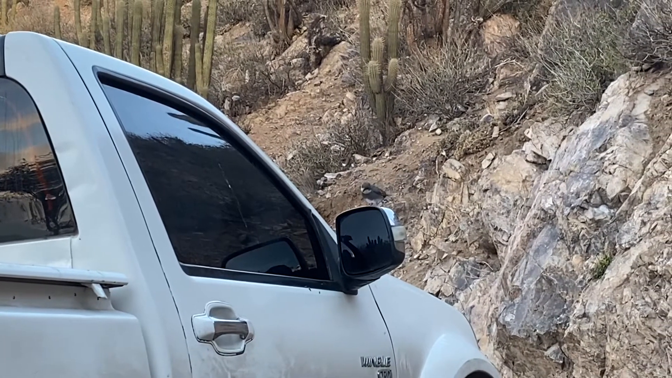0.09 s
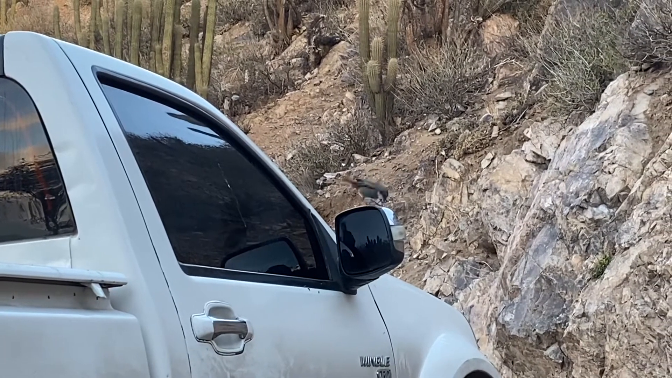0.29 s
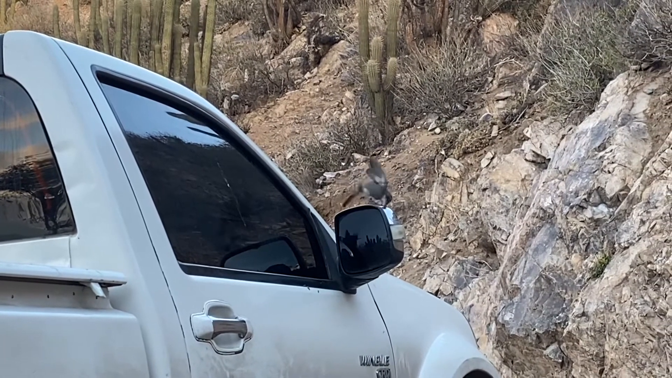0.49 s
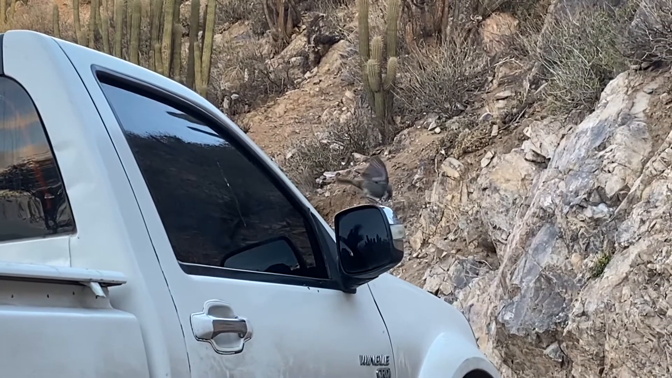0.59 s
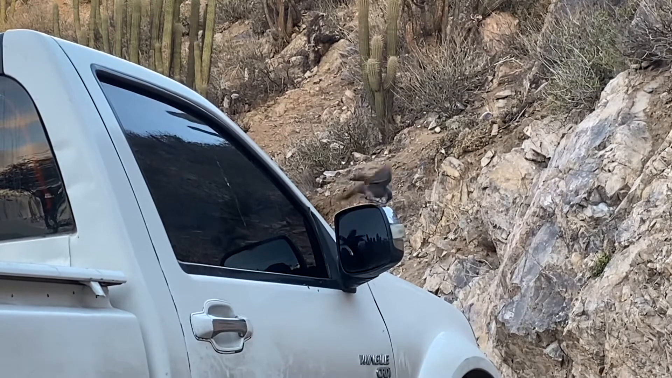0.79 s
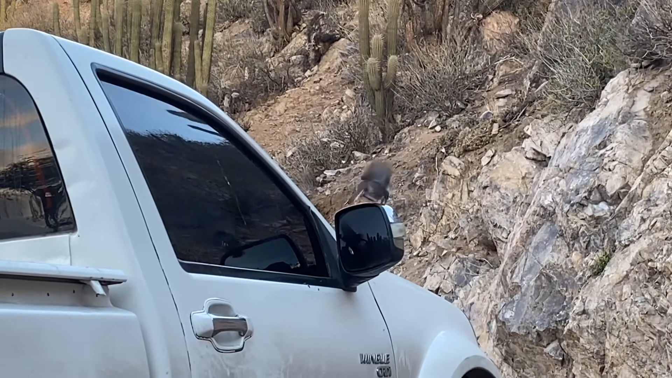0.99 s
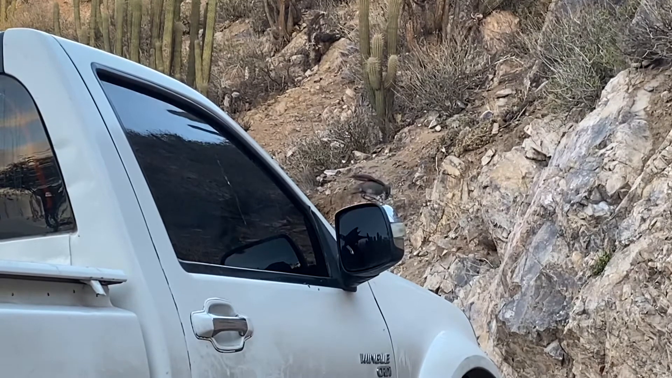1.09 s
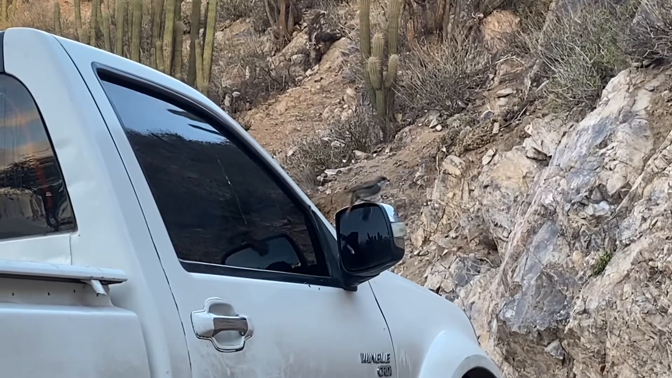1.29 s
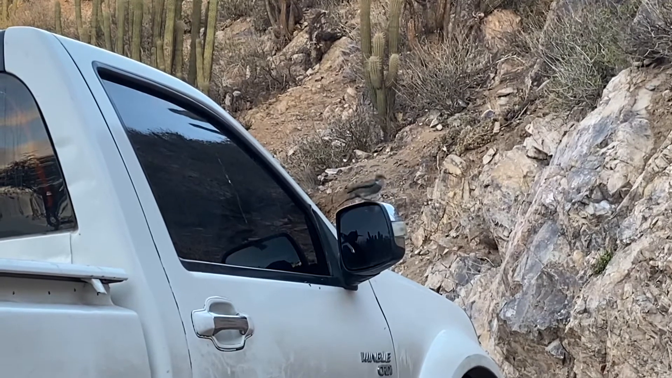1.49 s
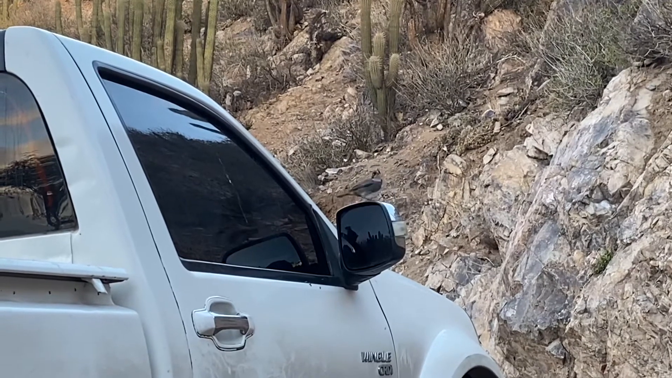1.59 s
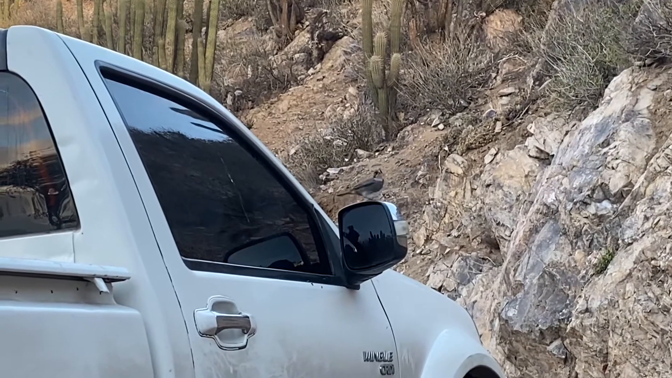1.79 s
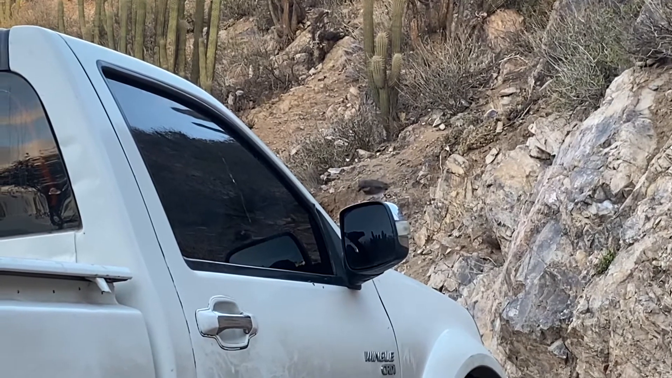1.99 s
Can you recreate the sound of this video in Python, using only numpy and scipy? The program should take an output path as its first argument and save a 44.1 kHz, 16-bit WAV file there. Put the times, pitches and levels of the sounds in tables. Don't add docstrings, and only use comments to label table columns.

```python
import sys
import numpy as np
from scipy import signal
from scipy.fft import rfft, irfft
from scipy.io import wavfile
from scipy.ndimage import uniform_filter1d

SR = 44100
rng = np.random.default_rng(int(sys.argv[2]) if len(sys.argv) > 2 else 0)


def level_to_linear(level):
    exponent = np.asarray(level, float) / 20
    return 10 ** exponent


def inscribe(sig):
    pcm = np.round(np.clip(np.atleast_2d(sig).T, -1, 1) * 32767)
    wavfile.write(sys.argv[1], SR, pcm.astype(np.int16))


N = 88200

# start_s, level_db, tilt_db_per_octave, strongest_mode_extra_db, two_low_modes_extra_db
PECKS = [
    (0.2242, -27.5, -1, 15.5, 3.5),
    (0.3597, -29.5, 0, 10.5, 7),
    (0.4845, -31, 1.5, 0.1, 4.5),
    (0.617, -29.5, 2, -13, 0.5),
    (0.7442, -29.5, 1, 7, -4),
    (0.8706, -29.5, -0.5, -6, -6),
    (0.9977, -28.5, 1.5, -12, 2.5),
    (1.1476, -27.5, 0.5, 4, -1),
]


def evened(x):
    return x / np.sqrt(np.mean(x ** 2) + 1e-20)


def read(points, hz):
    f, value = np.transpose(points)
    return np.interp(np.log(hz + 1), np.log(f + 1), value)


def add(mix, s, sound):
    part = mix[round(s * SR):][:len(sound)]
    part += sound[:len(part)]


def fuzzy_line(hz, width_hz):
    f = np.fft.rfftfreq(N, 1 / SR)
    noise = rfft(rng.standard_normal(N))
    return evened(irfft(noise / (1 + (2 * (f - hz) / width_hz) ** 2), N))


def wash():
    # pitch_hz, level_db_per_hz
    air = [(25, -31), (66, -5), (97, -1.5), (157, -11.5), (1560, -29), (2350, -45), (3600, -55.5),
           (12300, -60.5), (13300, -80)]
    # pitch_hz, likeness_0_to_1
    likeness = [(60, 0.35), (150, 0.52), (380, 0.95), (950, 0.51), (2380, 1), (5980, 1), (15000, 0.33)]
    frames, hz = N // 512 + 5, np.fft.rfftfreq(2048, 1 / SR)
    a, b, c, d, patches = rng.standard_normal((frames, 1025, 5)).T
    patches = uniform_filter1d(patches, size=20, axis=0)
    patches = evened(uniform_filter1d(patches, size=8, axis=1))
    same = np.clip(read(likeness, hz), -1, 1)[:, None]
    left = a + 1j * b
    right = same * left + np.sqrt(1 - same ** 2) * (c + 1j * d)
    z = np.array([left, right]) * level_to_linear(read(air, hz)[:, None] + 0.4 * patches)
    return level_to_linear(-54.5) * evened(signal.istft(z, nperseg=2048, noverlap=1536)[1][:, :N])


def hum():
    # pitch_hz, width_hz, level_db
    lines = [(58.3, 14, -56), (78.5, 12.4, -56), (151.98, 1.8, -59.5), (201.1, 4, -68.5)]
    # time_s, level_db
    curve = [(0.0, -48.5), (0.089, -50.5), (0.3, -50), (1.04, -55.5), (1.061, -44.5), (1.561, -56.5),
             (1.598, -36.5), (1.68, -79), (1.722, -48), (1.93, -63.5), (1.969, -48), (2.0, -57.5)]
    upper_swell = 0.4
    s, level = np.transpose(curve)
    swell_db = np.interp(np.arange(N) / SR, s, level) + 49
    out = np.zeros(N)
    for hz, width_hz, db in lines:
        share = 1 if hz < 100 else upper_swell
        out += level_to_linear(db + swell_db * share - 3 * (hz > 100)) * fuzzy_line(hz, width_hz)
    return out


def after_ring():
    levels = [-47, -52, -44, -46, -48, -48.5, -50.5, -55.5]
    ring_hz, width_hz, rise_s, t60_s = 486.7, 40, 0.06, 0.42
    t, envelope = np.arange(SR // 3) / SR, np.zeros(N)
    for (s, *_), db in zip(PECKS, levels):
        add(envelope, s, np.clip(t / rise_s, 0, 1) ** 2 * level_to_linear(db - 60 * t / t60_s))
    return envelope * fuzzy_line(ring_hz, width_hz)


def scatter(x):
    level_db, t60_s, low_hz = -19.5, 0.034, 900
    taps = rng.standard_normal(2000) * level_to_linear(-60 * np.arange(2000) / SR / t60_s)
    b, a = signal.butter(2, [low_hz / (SR / 2), .3], "band")
    side = signal.fftconvolve(signal.lfilter(b, a, x), taps / np.linalg.norm(taps))[:N]
    return level_to_linear(level_db) * np.array([side, -side])


def tail(far_db):
    # pitch_hz, t60_s
    panel_t60 = [(700, 0.2), (2500, 0.095), (6000, 0.066), (14000, 0.12)]
    far_t60_s = 0.48
    hz, t, z = signal.stft(rng.standard_normal(SR // 2), SR, nperseg=128)
    panels = level_to_linear(-60 * t / read(panel_t60, hz)[:, None])
    rocks = level_to_linear(far_db - 60 * t / far_t60_s)
    return signal.istft(z * (panels + rocks), SR, nperseg=128)[1]


def hump(hz):
    return np.exp(-(np.log2(np.clip(hz, 500, None) / 3050) / .3) ** 2)


def colour(tilt_db, mid_db=0):
    # pitch_hz, level_db_per_hz
    crack = [(410, -60), (700, -14.5), (3460, -5), (5060, -15.5), (7290, -16.5), (9110, -25.5),
             (12500, -28), (14500, -35), (16000, -35.5)]
    ragged_db = 1.8
    hz = abs(np.fft.fftfreq(2048, 1 / SR))
    ragged = np.interp(hz, np.linspace(0, SR / 2, 24), rng.standard_normal(24))
    db = read(crack, hz) + tilt_db * np.log2(np.clip(hz, 500, None) / 3000)
    db = db - 30 * (hz < 500) + ragged_db * ragged + mid_db * hump(hz)
    log = np.log(level_to_linear(db))
    tap = np.fft.ifft(np.exp(log - 1j * signal.hilbert(log).imag)).real[:1024]
    return tap / np.linalg.norm(tap)


def chatter(length, rise, fall):
    contacts_per_s = 3800
    chance, side = rng.random((2, 2048))
    t = np.arange(2048) / SR
    contacts = np.sign(side - .5) * (chance < contacts_per_s / SR)
    contacts = contacts + 0.34 * rng.standard_normal(2048)
    shape = np.clip(t / rise, 0, 1) ** 1.5 * np.exp(-np.clip(t - length, 0, None) / fall)
    out = contacts * shape
    return out * np.sqrt(length * SR / np.sum(out ** 2))


def scuff(db, length, tilt_db):
    out = tail(-20.5)
    out = level_to_linear(-6) * out * np.minimum(np.arange(len(out)) / SR / length, 1) ** 2
    add(out, 0, chatter(.6 * length, .6 * length, .3 * length))
    return level_to_linear(db) * signal.fftconvolve(out, colour(tilt_db))


def touch(db, length, hz):
    t60_s = .006
    t = np.arange(3000) / SR
    mode = level_to_linear(-60 * t / t60_s) * np.sin(2 * np.pi * hz * t)
    return level_to_linear(db) * np.convolve(chatter(length, .5 * length, 0.01), mode / np.linalg.norm(mode))


def swell(t, fall):
    peak_s = 0.0086
    u = np.clip(t / peak_s, 0, None)
    rise = np.sin(np.pi / 2 * u.clip(0, 1)) ** 2
    return np.where(u < 1, rise, np.exp(-fall * (u - 1) ** 2 / (1 + .5 * u)))


def knock(hz, db, delay, second_db, lag):
    t = np.arange(SR // 3) / SR
    first = swell(t, 3.6) * np.sin(2 * np.pi * hz * t)
    rebound = swell(t - delay, 1.5) * np.sin(2 * np.pi * (hz * t - lag))
    return level_to_linear(db) * first + level_to_linear(second_db) * rebound


def peck(db, tilt_db, strong_db, low_db, mid_db):
    mode_hz = [665, 1060, 1345, 1600, 1890, 2165, 2293, 2510, 2645, 2852, 3283, 3530, 3780, 4130]
    # level_db, t60_s
    mode_rings = [(-12.5, 0.14), (-15.5, 0.055), (-7, 0.097), (-6, 0.037), (-20, 0.031), (1, 0.029),
                  (-9, 0.064), (-6, 0.045), (-3.5, 0.059), (-4.5, 0.064), (-2.5, 0.008), (2, 0.024),
                  (-29, 0.029), (2, 0.023)]
    glass_db, crack_db, tail_db, far_db = -8.5, -11.5, -14, -37
    detune, uneven_db, blow = 0.0071, 1, 1.6
    t = np.arange(6000) / SR
    drive, click = chatter(0.0065, 0.0007, 0.0029), colour(tilt_db, mid_db)
    modes = np.zeros(len(t))
    for k, (hz, (mode_db, t60)) in enumerate(zip(mode_hz, mode_rings)):
        uneven, off, phase = rng.standard_normal(3)
        level = mode_db + uneven_db * uneven + mid_db * hump(hz)
        level = level + strong_db * (k == 6) + low_db * (k in (2, 3))
        pitch = hz * (1 + detune * np.tanh(off))
        modes += level_to_linear(level - 60 * t / t60) * np.sin(2 * np.pi * pitch * t + phase)
    struck = drive + blow * np.linalg.norm(drive) * (np.arange(len(drive)) == 20)
    ring = np.convolve(struck / np.hypot(1, blow), modes * np.minimum(t / 0.0019, 1) / 20)
    out = level_to_linear(tail_db) * signal.fftconvolve(tail(far_db - tail_db), click)
    add(out, 0, level_to_linear(glass_db) * ring)
    add(out, 0, level_to_linear(crack_db) * np.convolve(drive, click))
    return level_to_linear(db) * out


def bird():
    # pitch_hz, level_db, rebound_delay_s, rebound_level_db, rebound_lag_cycles
    knocks = [
        (487.4, -25.5, 0.017, -32, 0.66),
        (483, -29, 0.0185, -35.5, 0.21),
        (480, -31.5, 0.0096, -32.5, 0.068),
        (487, -31, 0.016, -33.5, 0.077),
        (483, -31.5, 0.0097, -33.5, 0.016),
        (492, -34, 0.018, -36, 0.41),
        (488, -30.5, 0.013, -35.5, 0.2),
        (483, -29.5, .018, -36.5, 0.7),
    ]
    mids = [-5, -1, -1, 0.5, 2.1, 0.5, 2, 0.9]
    # start_s, level_db, length_s, tilt_db_per_octave
    scuffs = [(0.209, -69, 0.014, 10), (0.373, -51.5, 0.013, 4), (0.443, -54.5, 0.0095, 4.5),
              (0.469, -56, 0.016, -1), (0.55, -45, 0.012, 28), (0.555, -62, 0.011, -0.5),
              (0.638, -54, 0.0083, -3.5), (0.679, -45.5, 0.0033, 35), (0.725, -57.5, 0.0071, 0),
              (0.769, -50, 0.0091, 10), (0.827, -60.5, 0.0081, 11.5), (0.83, -69, 0.015, -11),
              (0.887, -51.5, 0.0098, 3.5), (0.943, -69, 0.015, 7), (0.964, -69.5, 0.036, 12),
              (1.021, -52, 0.0081, -1), (1.07, -51, 0.017, 8.5), (1.132, -65, 0.02, 3),
              (1.178, -54, 0.005, -3.5), (1.189, -53.5, 0.0091, 14.5), (1.216, -63, 0.0026, -3),
              (1.274, -67, 0.0083, 16.5), (1.89, -62, 0.0051, 14), (1.896, -59.5, 0.013, 10),
              (1.997, -81, 0.0064, 3.)]
    # start_s, level_db, length_s, pitch_hz
    touches = [(0.134, -76, .03, 2370), (0.429, -58.5, 0.0028, 2630), (0.446, -65.5, 0.0065, 4150),
               (0.478, -52, 0.0057, 2540), (0.563, -60, 0.0059, 2280), (0.828, -60, 0.013, 2310),
               (1.071, -58.5, 0.014, 2320), (1.121, -66, 0.016, 2450), (1.273, -60, 0.0086, 2330),
               (1.8975, -57.5, 0.0069, 2220), (1.898, -53.5, 0.0051, 1430)]
    # start_s, pitch_hz, level_db
    nudges = [
        (0.476, 550, -41.5),
        (1.902, 463, -55),
        (1.28, 494, -48),
    ]
    mix = np.zeros(N)
    for (s, *row), hollow, mid_db in zip(PECKS, knocks, mids):
        add(mix, s - .0008, peck(*row, mid_db))
        add(mix, s, knock(*hollow))
    for s, *row in scuffs:
        add(mix, s, scuff(*row))
    for s, *row in touches:
        add(mix, s, touch(*row))
    for s, hz, db in nudges:
        add(mix, s, knock(hz, db, .012, db - 14, .45))
    return mix


def scene():
    near = bird()
    return wash() + hum() + after_ring() + scatter(near) + near


def roll_off(x):
    return signal.sosfilt(signal.butter(12, 16500, fs=SR, output="sos"), x)


def record(dry):
    # pitch_hz, left_minus_right_db
    lean = [(60, 2.4), (140, 4), (210, 9.5), (330, 7.5), (520, 5.), (800, 7.5), (1200, 3.5), (1800, 3)]
    # pitch_hz, left_lead_radians
    low_phase = [(60, 0.24), (200, 0.28), (500, 0.052), (900, 0.66), (1300, 1), (1800, 0.1)]
    # pitch_hz, left_lead_half_cycles
    ports = [(7400, 0), (8700, .97), (9550, 1.06), (10500, 1.8), (10900, 1.98), (11500, 2.07),
             (12700, 2.83), (13700, 3.1), (14700, 3.9)]
    edge_hz, pad = 15700, 2048
    size = N + 2 * pad
    wide = np.pad(dry, ((0, 0), (pad, pad)), mode="reflect")
    hz = np.fft.rfftfreq(size, 1 / SR)
    low = np.clip((2600 - hz) / 800, 0, 1)
    turn = low * read(low_phase, hz) + np.pi * np.interp(hz, *np.transpose(ports))
    half = level_to_linear(low * read(lean, hz) / 2) * np.exp(.5j * turn)
    edge = 1 / (1 + (hz / edge_hz) ** 120)
    out = irfft(rfft(wide) * np.array([half, 1 / half]) * edge, size)[:, pad:N + pad]
    out = out * np.minimum(np.arange(N) / 100, 1)
    return roll_off(out)


dry = scene()
out = record(dry)
inscribe(out)
```